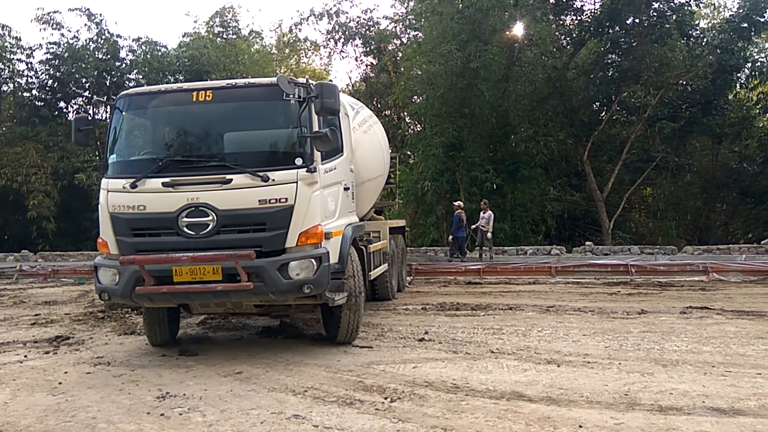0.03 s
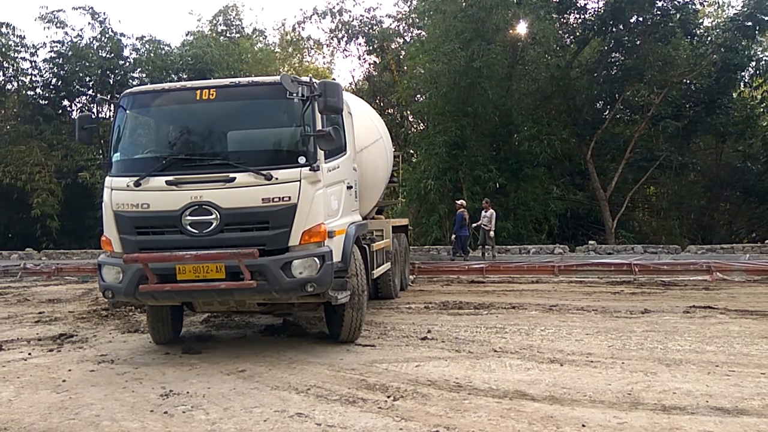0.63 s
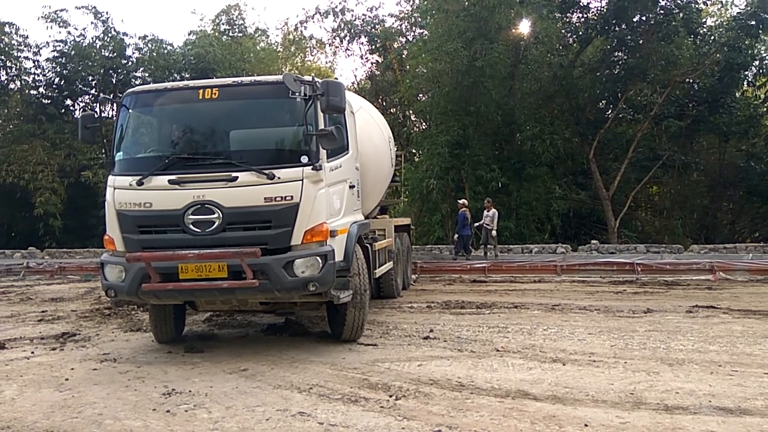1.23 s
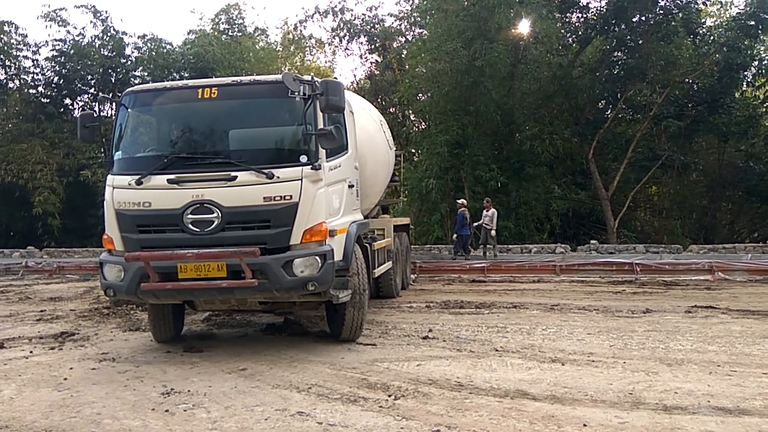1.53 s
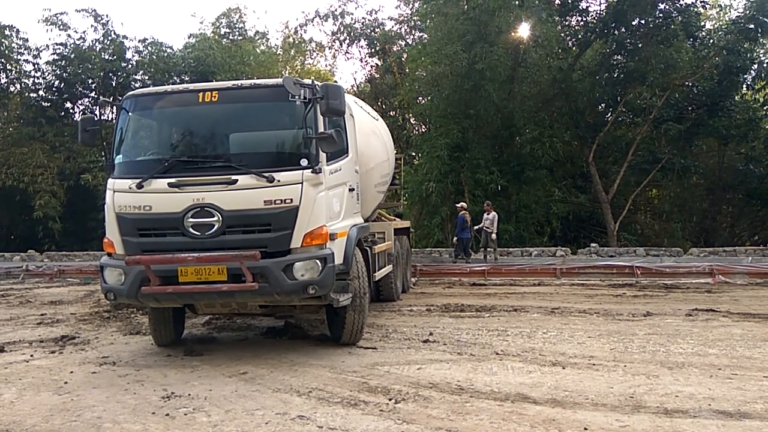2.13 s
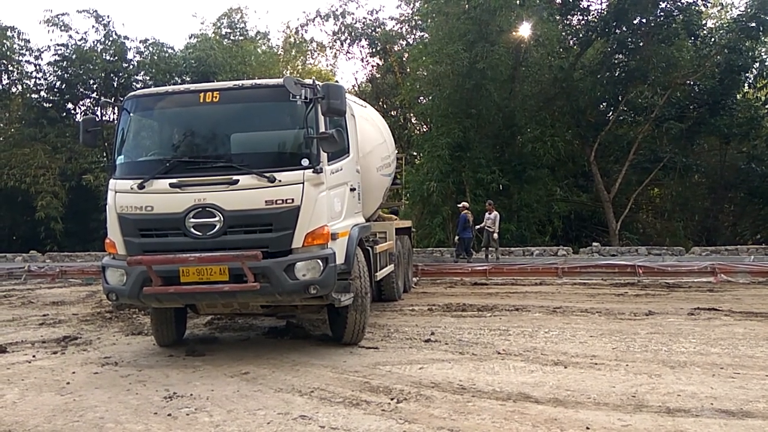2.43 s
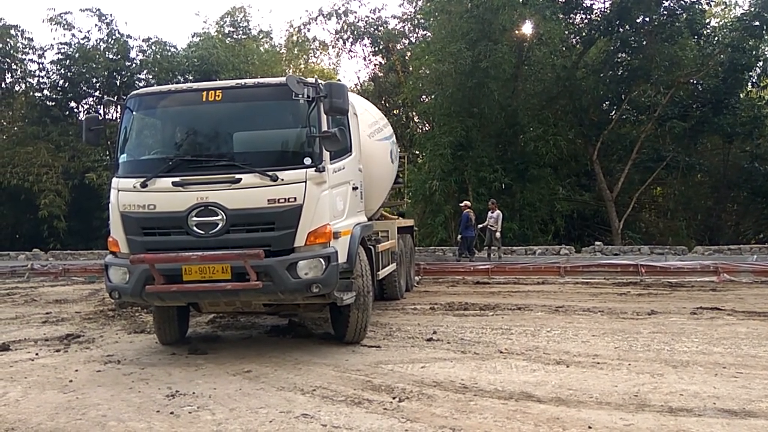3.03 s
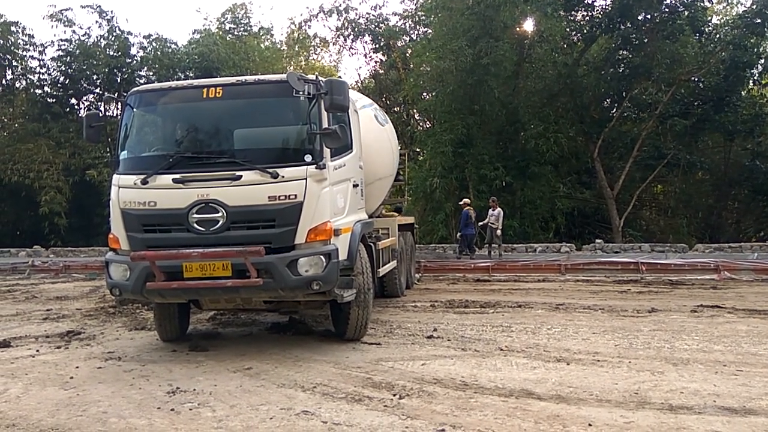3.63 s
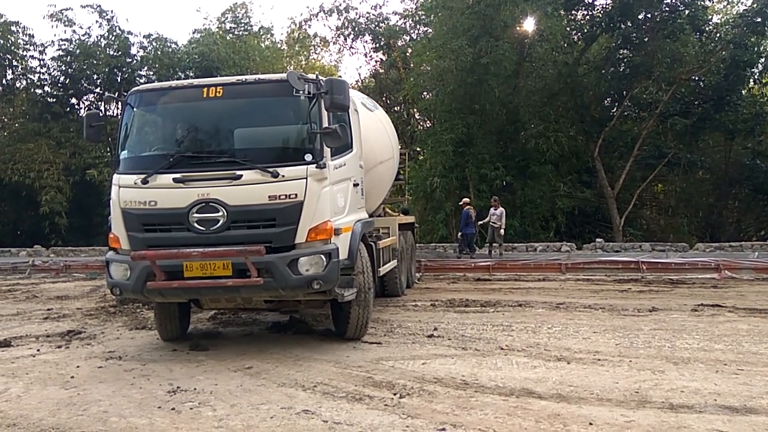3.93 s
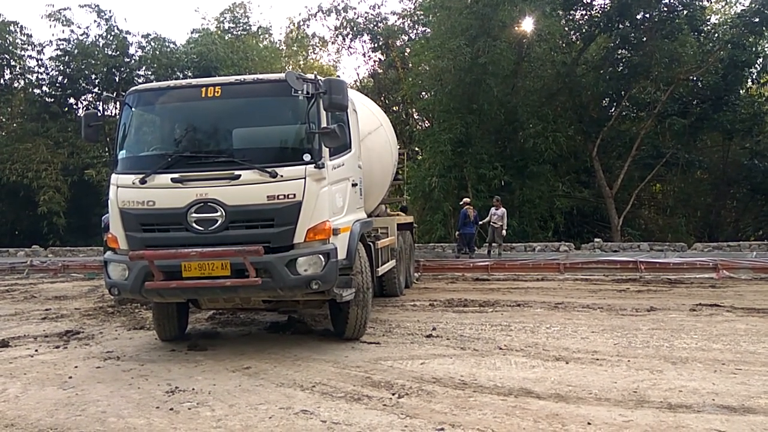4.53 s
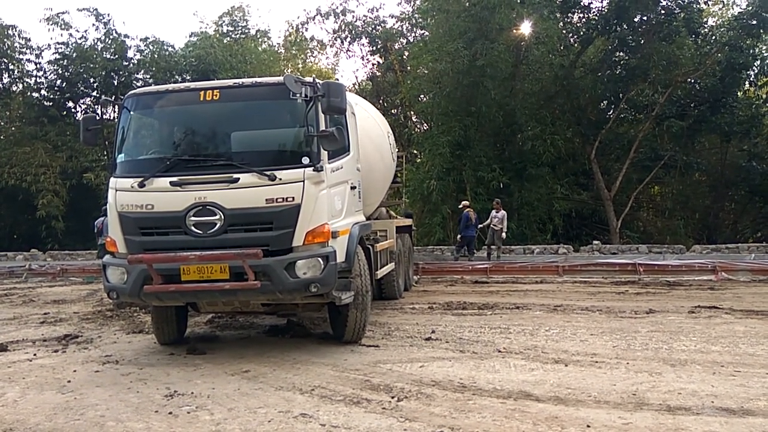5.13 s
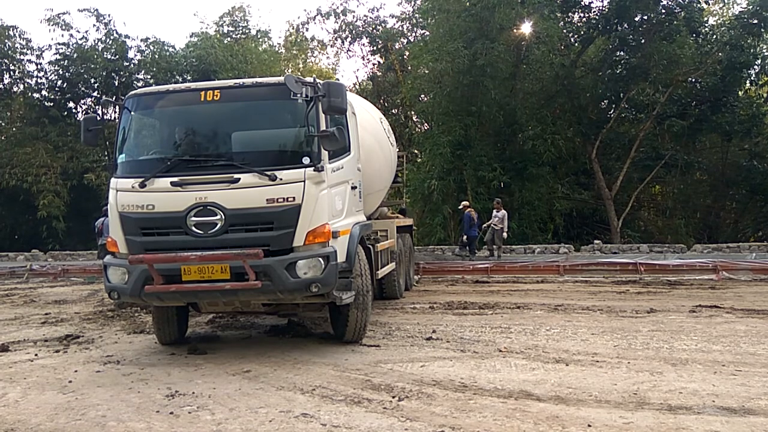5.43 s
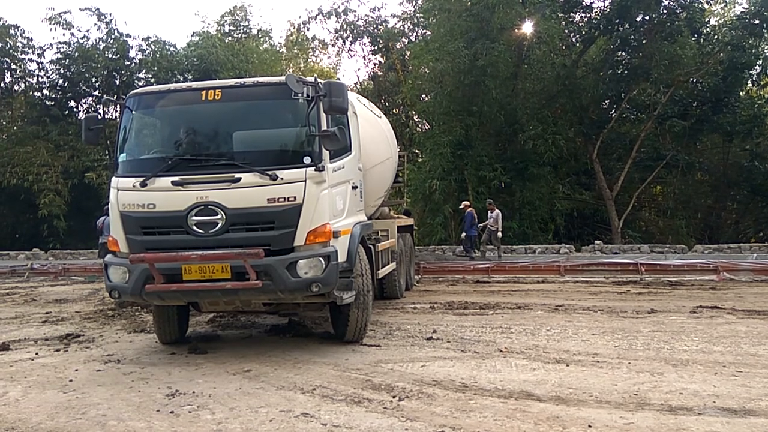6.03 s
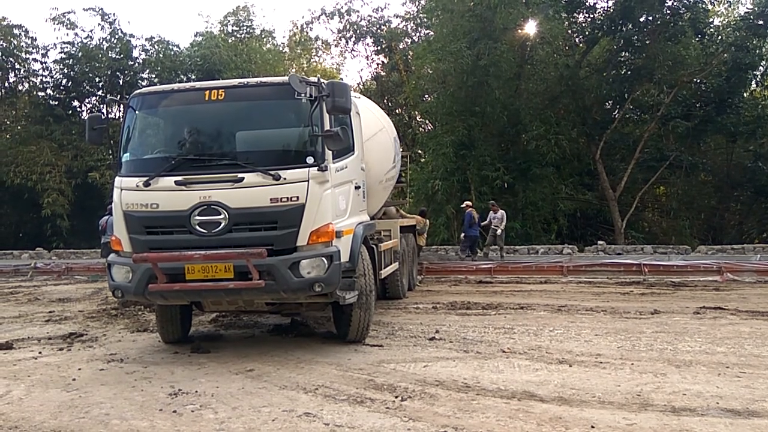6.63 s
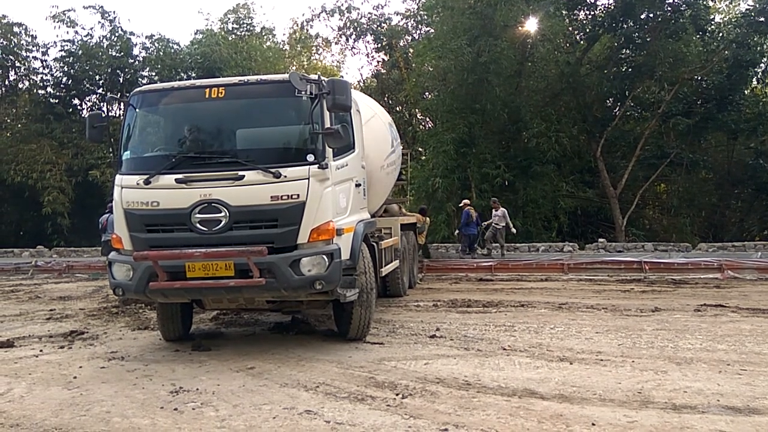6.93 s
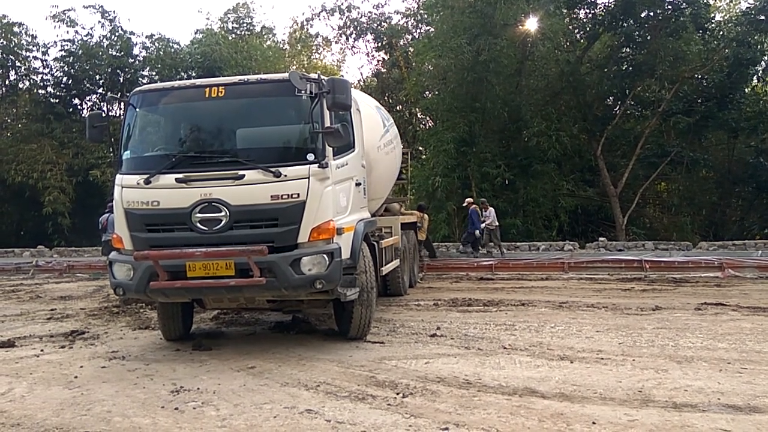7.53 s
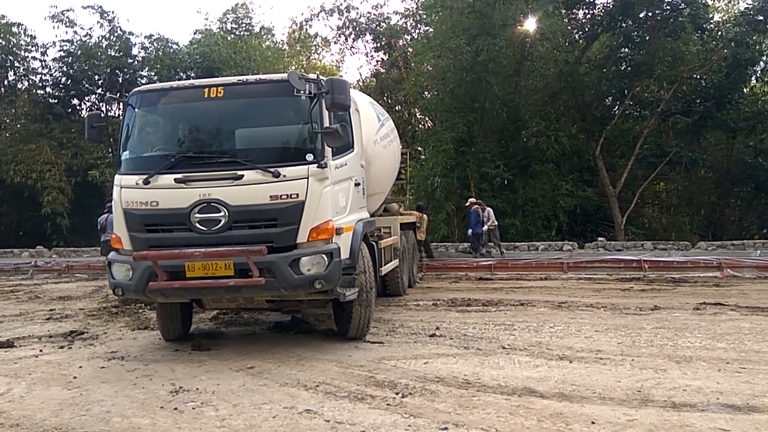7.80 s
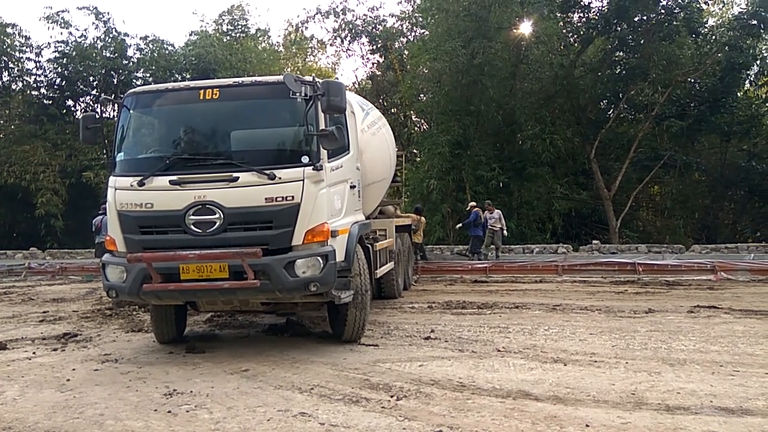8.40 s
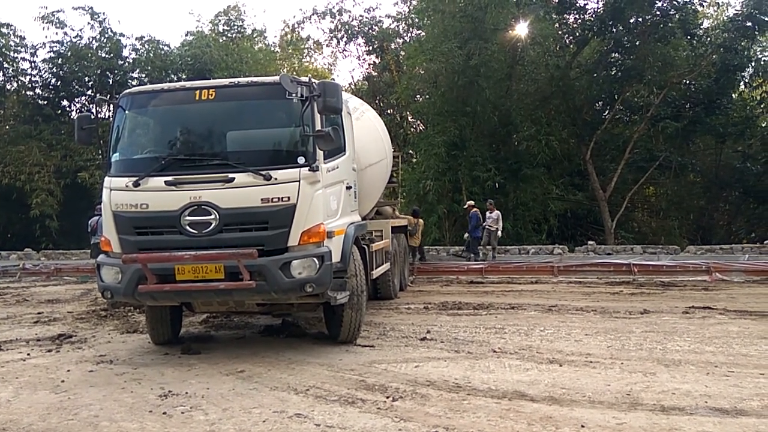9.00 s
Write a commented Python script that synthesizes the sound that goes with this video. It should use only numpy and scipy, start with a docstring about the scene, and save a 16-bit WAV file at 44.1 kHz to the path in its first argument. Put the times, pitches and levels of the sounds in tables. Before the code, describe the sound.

A concrete mixer truck's diesel engine runs at high revs, humming, knocking and whining, while wet concrete thuds in the turning drum and stones rattle against the steel shell. The revs ease, then drop to a clacking idle. A few hard raps follow, loose fittings clink faintly and the engine picks up again. It is heard in stereo on open ground, slightly to the right.

```python
"""A concrete mixer truck on open ground, a little off the axis of a stereo microphone pair.
First the six-cylinder diesel runs at high revs: exhaust hum, knocking block, gear whine and fan rush,
while wet concrete thuds in the turning drum and stones ring its steel shell. From 3.5 s the revs ease;
at 6.6 s the fuel is cut and they sink to a clacking idle, baring a panel's drone and the site's hiss.
Near 8 s the fuel returns with hard raps, loose fittings clink and the revs pick up again."""
import sys
import numpy as np
from scipy import signal
from scipy.fft import rfft, irfft, next_fast_len
from scipy.io import wavfile
from scipy.ndimage import uniform_filter1d, map_coordinates

SR = 44100
rng = np.random.default_rng(int(sys.argv[2]) if len(sys.argv) > 2 else 0)


def inscribe(sig):
    """Save sig as 16-bit PCM at rate SR to the path in sys.argv[1].

    A 1-D sig is mono; a 2-D sig holds one channel per row.
    Samples are clipped to [-1, 1] before scaling.
    """
    pcm = np.round(np.clip(np.atleast_2d(sig).T, -1, 1) * 32767)
    wavfile.write(sys.argv[1], SR, pcm.astype(np.int16))


N = 408366
FULL_EFFORT_DB = -34  # knock level of the engine working hardest

# how alike the two microphones hear a source: (frequency [Hz], likeness [0-1])
MIC_LIKENESS = [(60, .99), (400, .98), (1000, .9), (2000, .7), (4000, .25), (7000, .2)]
# spectrum of the knocking engine block: (frequency [Hz], level [dB])
BLOCK_SPECTRUM = [(30, -29.5), (65, -5.5), (110, 2.5), (175, 7), (250, -12.5), (345, 7), (470, -5.5),
                  (600, -14.5), (720, -6), (820, -9), (1180, 1.5), (1450, -9.5), (1790, -2), (2280, -1.5),
                  (2800, -12.5), (3200, -21.5), (4000, -27.5), (4600, -32), (5900, -24.5), (7200, -41)]
# modes of the block that clack at each firing: (frequency [Hz], level [dB], t60 [s])
BLOCK_MODES = [(870, -4, .045), (1090, -3, .05), (1190, 0, .05), (1660, -4, .045), (1790, -4, .045),
               (2160, -4.5, .05), (2270, -5.5, .055), (2730, -13, .04)]
# spectrum of stones on the steel shell: (frequency [Hz], level [dB])
GRAVEL_SPECTRUM = [(250, -34.5), (520, -3.5), (660, -2.5), (860, 1.5), (1230, 0), (1400, -10.5), (1650, -4),
                   (2350, -9), (2900, -13.5), (3200, -24.5), (4000, -30), (4700, -19), (5900, -19),
                   (7200, -47.5)]
# the hardest firings as the fuel comes back: (time [s], level [dB])
HARD_FIRINGS = [(7.896, -31), (7.952, -28), (7.9803, -25), (8.006, -21), (8.11, -30), (8.136, -19),
                (8.262, -23), (8.309, -21), (8.358, -22), (8.428, -21), (8.498, -21), (8.631, -20),
                (8.675, -19), (8.923, -20)]


def amp(db):
    """Decibels to gain."""
    return 10 ** (np.asarray(db) / 20)


def unit(x):
    """Scale to rms 1."""
    return x / np.sqrt(np.mean(x ** 2) + 1e-20)


def along(points, hz):
    """(Hz, value) points read on a log axis."""
    f, v = np.transpose(points)
    return np.interp(np.log(hz + 1), np.log(f + 1), v)


def curve(points):
    """(time, value) points read at every sample."""
    return np.interp(np.arange(N) / SR, *np.transpose(points))


def noise(size=N):
    """Two unrelated white noises."""
    return rng.standard_normal((2, size))


def wobble(rate):
    """A smooth random curve, rate knots a second."""
    return map_coordinates(rng.standard_normal(int(N * rate / SR) + 4), [np.arange(N) * rate / SR])


def filtered(x, response):
    """Pass x through a frequency response."""
    size = next_fast_len(N + SR // 2)
    return irfft(rfft(x, size) * response(np.fft.rfftfreq(size, 1 / SR)), size)[..., :N]


def colour(points):
    """The response of a (Hz, dB) spectrum."""
    return lambda hz: amp(along(points, hz))


def resonances(modes):
    """The response of (Hz, width Hz, dB) resonances, which radiate little below their pitch."""
    return lambda hz: sum(amp(db) * 1j * hz * width / (centre ** 2 - hz ** 2 + 1j * hz * width)
                          * np.minimum(hz / centre, 1) ** 2 for centre, width, db in modes)


def radiate(sound, response):
    """Two signals coloured by a body, at rms 1; scattering makes the microphones differ in the treble."""
    def mid_and_side(hz):
        angle = np.arccos(np.clip(along(MIC_LIKENESS, hz), 0, .99)) / 2
        return response(hz) * np.array([np.cos(angle), np.sin(angle)])
    mid, side = filtered(sound, mid_and_side)
    return unit(np.array([mid + side, mid - side]))


def bursts(times, sizes, t60):
    """Envelope of blows that each die away; their energies add."""
    blows = np.bincount(np.clip(times * SR, 0, N).astype(int), sizes ** 2, N + 1)[:N]
    fade = amp(-60 * np.arange(SR // 2) / SR / t60) ** 2
    return np.sqrt(np.abs(signal.fftconvolve(blows, fade)[:N]))


def patter(count, spread_db, t60):
    """Envelope of many random impacts of uneven size."""
    return unit(bursts(rng.random(count) * N / SR, amp(spread_db * rng.standard_normal(count)), t60))


def swells(rows, attack_s=.018, t60=.27):
    """Envelope of (time, length, dB) surges: each rises, holds and dies away; their energies add."""
    t = np.arange(N) / SR
    energy = np.zeros(N)
    for start, length, db in rows:
        span = slice(int(start * SR), int(start * SR) + 2 * SR)
        age = t[span] - start
        shape = np.clip(age / attack_s, 0, 1) * amp(db - 60 * np.maximum(age - length, 0) / t60)
        energy[span] += shape ** 2
    return np.sqrt(energy)


def pings(times, hz, db, t60):
    """Single modes struck once each; every one reaches the two microphones with its own phase gap."""
    t = np.arange(SR // 18) / SR
    samples = ((times * SR).astype(int)[:, None] + np.arange(len(t))).ravel()
    envelope = amp(db[:, None] - 60 * t / t60) * (1 - np.exp(-t / .0012))
    skew = np.arccos(np.clip(along(MIC_LIKENESS, hz), 0, 1)) * rng.standard_normal(len(hz)) / 2
    phase = 2 * np.pi * hz[:, None] * t
    rings = (envelope * np.sin(phase + side * skew[:, None]) for side in (1, -1))
    return np.array([np.bincount(samples, ring.ravel(), N)[:N] for ring in rings])


def struck(modes, times, db, detune=.03, scatter_db=3.5, spread_s=.003):
    """Blows on one object: each shock reaches all its modes within spread_s, never twice the same."""
    hz, mode_db, t60 = np.tile(np.transpose(modes), len(times))
    pitch, size = rng.standard_normal((len(hz), 2)).T
    starts = np.repeat(times, len(modes)) + spread_s * rng.random(len(hz))
    level_db = np.repeat(db, len(modes)) + mode_db + scatter_db * size
    return pings(starts, hz * (1 + detune * pitch), level_db, t60[:, None])


def exhaust(firings, firing_hz, knock_db, slowing, fuel_cut_db=-13.5):
    """The pipe hums at the firing rate and its octave, louder with effort and where it resonates."""
    # the pipe favours some firing rates: (firing rate [Hz], level [dB])
    pipe = [(37, -60), (43, -46), (49, -36), (63, -36), (73, -35.5), (75, -29), (83, -32.5)]
    level_db = along(pipe, firing_hz) + .51 * (knock_db - FULL_EFFORT_DB) + fuel_cut_db * slowing ** 4
    note = amp(level_db - 1 + 1.1 * wobble(7.7)) * np.sin(2 * np.pi * firings)
    # a harder burn gives a sharper puff
    octave = amp(knock_db - 5 + 1.8 * wobble(6)) * np.sin(4 * np.pi * firings)
    return np.sqrt(2) * (note + octave * (firing_hz / firing_hz.max()) ** .84)


def knock(firings, knock_db, cylinder_db=2.2, scatter_db=.43, attack_s=.002, t60=.078):
    """Each firing raps the block: every cylinder has its own ring, plus clatter that never repeats."""
    beat = np.arange(int(firings[-1]))
    times = np.interp(beat, firings, np.arange(N) / SR)
    imbalance_db = cylinder_db * np.resize(rng.standard_normal(6), len(beat))
    sizes = amp(imbalance_db + scatter_db * rng.standard_normal(len(beat)))
    t = np.arange(SR // 6) / SR
    decay = amp(-60 * t / t60) * (1 - np.exp(-t / attack_s))
    rings = np.zeros((2, N))
    for cylinder in range(6):
        own = beat % 6 == cylinder
        blows = np.bincount((times[own] * SR).astype(int), sizes[own], N)
        rings += signal.fftconvolve(blows[None], noise(len(t)) * decay, axes=1)[:, :N]
    clatter = uniform_filter1d(bursts(times, sizes, t60), size=240) * noise()
    force = unit(rings) + .53 * unit(clatter)
    weight = 1 / np.sqrt(np.gradient(firings))  # slower firings each carry more energy
    return amp(knock_db + 3.5) * radiate(force * weight, colour(BLOCK_SPECTRUM))


def valves(firings, knock_db, per_firing=4, late_beats=.4, low_hz=690, high_hz=2800):
    """Valves and injectors ping on the block slightly after each firing."""
    beat = np.repeat(np.arange(int(firings[-1])), per_firing)
    lag, pitch, size = rng.random((len(beat), 3)).T
    at = np.minimum(np.searchsorted(firings, beat + late_beats * lag), N - 1)
    hz = low_hz + (high_hz - low_hz) * pitch
    db = knock_db[at] - 2 + along(BLOCK_SPECTRUM, hz) + 6 * size
    return pings(at / SR, hz, db, t60=.085)


def clacks(firings, firing_hz, knock_db):
    """The diesel clack: a short ring of the block at every firing, hardest at low revs."""
    at = np.searchsorted(firings, np.arange(1, int(firings[-1])))
    softening_db = 20 * np.log10(firing_hz[at] / firing_hz.min())
    db = knock_db[at] + 2.7 - softening_db + 2.5 * rng.standard_normal(len(at))
    return struck(BLOCK_MODES, at / SR, db)


def gears(firings, firing_hz, knock_db, slowing):
    """Gear tones swell as they sweep through the resonances of the block and the gear case."""
    # gear whines: (pitch [x firing rate], level [dB], lift in a case band [dB], lift as revs fall [dB])
    whines = [(13, -7, 0, 0), (13.333, -9, 0, 0), (14.5, -9, 0, 0), (16.5, -13, 14, 2), (17.1, -17, 9, 9),
              (22.333, -12, 0, 0), (27.333, -16, 0, 0), (31.68, -12, 2, 2), (34.8, -4, 11, 7),
              (36.6, -11, 6, 12), (39.6, -5, 0, 2)]
    # bands where the gear case sings: (centre [Hz], width [Hz], strength [0-1])
    case_bands = [(1190, 70, 1), (1670, 65, .6), (1815, 65, .7), (2170, 60, .55)]
    tones = np.zeros(N)
    for multiple, db, case_db, overrun_db in whines:
        hz = multiple * firing_hz
        singing = sum(strength / (1 + ((hz - centre) / width) ** 2)
                      for centre, width, strength in case_bands)
        lift_db = case_db * np.minimum(singing, 1) + overrun_db * slowing
        level_db = knock_db + db + lift_db + along(BLOCK_SPECTRUM, hz) + 2.4 * wobble(16)
        chatter = (.2 + .7 * slowing) * wobble(70)  # unloaded teeth roughen the tone
        tones += amp(level_db) * np.sin(2 * np.pi * multiple * firings + chatter)
    return np.sqrt(2) * tones * (firing_hz / firing_hz.max()) ** 2


def fan(firings, speed):
    """The cooling fan: a rush and a fuzzy, throbbing blade tone, both growing with engine speed."""
    # swells of the blade tone: (time [s], length [s], level [dB])
    hoots = [(.77, .06, -34), (1.21, 0.1, -30.5), (1.38, 0.3, -30), (2.3, 0.16, -32), (2.55, 0.063, -26),
             (2.94, 0.1, -40.5), (3.21, 0.053, -26), (3.4, .06, -34)]
    # spectrum of the rushing air: (frequency [Hz], level [dB])
    air_spectrum = [(30, -2.5), (100, 6.5), (1000, -7), (2600, -6.5), (3300, -15), (4000, -23),
                    (4700, -20.5), (6000, -10.5), (7200, -27.5)]
    phase = 2 * np.pi * 5.85 * firings
    tone = wobble(30) * np.sin(phase) + wobble(30) * np.cos(phase)
    blade_level = np.hypot(amp(-38) * speed ** 6, swells(hoots)) * speed ** 2
    rush = amp(-45 + .62 * wobble(2.7)) * speed ** .5 * radiate(noise(), colour(air_spectrum))
    return blade_level * tone + rush


def drum_drive(firings, speed, knock_db):
    """Pump and drum drive hum with the crank, harder under load, and fade quickly as the revs drop."""
    # drive tones: (pitch [x firing rate], level [dB], flutter [dB], phase jitter [rad])
    hums = [(1.48, -41.5, 2, .7), (1.713, -32.5, 5, .6), (1.975, -29, 3.5, 0.73), (4.337, -33, 3.5, 0.63)]
    tones = np.zeros(N)
    for multiple, db, flutter_db, jitter in hums:
        level = amp(db + flutter_db * wobble(6))
        tones += level * np.sin(2 * np.pi * multiple * firings + jitter * wobble(10))
    return np.sqrt(2) * tones * speed ** 7 * amp(.72 * (knock_db - FULL_EFFORT_DB))


def tumbling(db):
    """Gain of the load as it tumbles unevenly, wandering around db."""
    return amp(db + 1.7 * wobble(13))


def drum_boom(load, speed):
    """Wet concrete drops off the blades and thuds in the hollow drum."""
    # heavy masses falling: (time [s], length [s], level [dB])
    drops = [(0.13, 0.16, -23), (0.34, 0.14, -23.5), (0.69, .36, -22.5), (1.18, 0.11, -27.5),
             (1.39, 0.042, -21.5), (1.65, 0.023, -22.5), (1.86, .06, -23), (2.21, 0.064, -22),
             (2.41, 0.045, -22.5), (2.65, 0.24, -23), (2.77, 0.05, -24), (2.93, 0.028, -21),
             (3.07, 0.048, -24), (3.34, 0.044, -19), (3.52, 0.039, -25.5), (3.71, 0.099, -24),
             (4.58, .1, -31.5), (4.73, 0.12, -22), (5.31, 0.012, -22.5), (6.86, 0.13, -37.5),
             (8.48, 0.053, -32.5), (8.7, 0.043, -24.5), (9.08, 0.12, -28.5)]
    # spectrum of a dull thud: (frequency [Hz], level [dB])
    thud_spectrum = [(25, -31), (45, -44.5), (58, -17), (110, -14.5), (130, -10), (150, 0), (205, 0),
                     (250, -7), (330, -29), (600, -66)]
    # deep resonances of the hollow drum: (centre [Hz], width [Hz], level [dB])
    cavity_modes = [(142.6, 3, 0.5), (168.4, 13, -2), (206.1, 5, 0)]
    thuds = radiate(patter(count=2500, spread_db=.5, t60=.051) * noise(), colour(thud_spectrum))
    cavity = amp(-6) * radiate(noise(), resonances(cavity_modes))
    return np.hypot(tumbling(8.5) * load * speed ** 2.4, swells(drops)) * unit(thuds + cavity)


def churn(load, speed):
    """Lumps of wet concrete churn and slump along the shell."""
    # slumps: (time [s], length [s], level [dB])
    slumps = [(0, 0.068, -24.5), (.64, 0.046, -29), (1.18, 0.09, -27), (1.49, 0.066, -24.5),
              (1.68, 0.084, -24.5), (2.12, 0.056, -22), (2.78, 0.053, -27), (3.03, 0.063, -22.5),
              (3.62, 0.18, -29), (3.96, 0.1, -32.5), (4.24, 0.071, -31.5), (4.5, 0.043, -32),
              (4.82, 0.1, -47), (5.18, 0.037, -25), (5.28, 0.07, -24), (5.48, 0.13, -30),
              (5.74, 0.098, -34), (6.35, 0.15, -35), (6.62, 0.37, -38.5)]
    # spectrum of the churning lumps: (frequency [Hz], level [dB])
    lump_spectrum = [(120, -56.5), (200, -5), (255, 2.5), (330, 4.5), (385, -4), (470, -3), (525, -10.5),
                     (700, -12.5), (1200, -59)]
    lumps = radiate(patter(count=3000, spread_db=3, t60=.05) * noise(), colour(lump_spectrum))
    return np.hypot(tumbling(8) * load * speed ** 2.4, swells(slumps)) * lumps


def shell_ring(load, speed):
    """The tumbling load keeps the steel shell ringing."""
    # modes of the shell: (centre [Hz], width [Hz], level [dB])
    shell_modes = [(256.8, 20, 2), (318.6, 2.6, 0.5), (415.3, 16, -0.5), (726, 14, -4), (880, 9, -2.5),
                   (1077, 25, -9), (1175, 3.3, -13.5)]
    return tumbling(4.5) * load * speed ** 1.9 * radiate(noise(), resonances(shell_modes))


def rattle(count=3600, low_hz=600, high_hz=2900, spread_db=4):
    """Stones strike the shell one by one, each ringing a mode of its own."""
    when, pitch = rng.random((count, 2)).T
    hz = low_hz + (high_hz - low_hz) * pitch
    db = along(GRAVEL_SPECTRUM, hz) + spread_db * rng.standard_normal(count)
    return unit(pings(when * N / SR, hz, db, t60=.07))


def gravel(load, speed):
    """A fast drum throws stones about, and now and then they pour over the shell."""
    # pours of stones: (time [s], length [s], level [dB])
    spills = [(0, 0.97, -31.5), (1.08, .27, -29.5), (1.40, 0.033, -24.5), (1.49, 0.038, -26.5),
              (2.02, 0.041, -29), (2.12, 0.039, -24.5), (2.55, 0.052, -25), (2.775, 0.061, -25.5),
              (2.94, 0.027, -26.5), (3.065, 0.017, -23), (3.36, 0.068, -27.5), (5.245, 0.15, -31)]
    # falling stones ring brighter than tumbling ones: (frequency [Hz], gain [dB])
    spill_tilt = [(600, -4), (1200, -0.5), (2200, 2.5)]
    stones = radiate(patter(count=5000, spread_db=1, t60=.047) * noise(), colour(GRAVEL_SPECTRUM))
    grit = unit(stones + amp(1) * rattle())
    thrown = amp(6.5 + 1.2 * wobble(11)) * load * speed ** 2.33 * grit
    falling = filtered(np.roll(grit, SR, axis=1), colour(spill_tilt))  # shifted to sound as other stones
    return thrown + swells(spills, attack_s=.035, t60=.28) * falling


def stone_strikes(t60=.04):
    """A big stone lands with a crack and rings one spot of the shell."""
    # landings: (time [s], level [dB], ring [Hz])
    landings = [(0.242, -13, 705), (0.524, -14, 1070), (0.639, -13, 1130), (0.857, -16, 1130),
                (1.147, -12, 902), (2.136, -14, 1120), (2.574, -13, 1250), (3.066, -13, 877),
                (5.256, -14, 840)]
    times, db, hz = np.transpose(landings)
    crack = bursts(times, amp(db - 12), t60) * radiate(noise(), colour(GRAVEL_SPECTRUM))
    return crack + pings(times, hz, db - 9, t60)


def intake_drone(firings, speed, slowing):
    """The coasting engine drones roughly through its intake, sliding down with the revs."""
    # drone partials: (pitch [x firing rate], level [dB])
    partials = [(2, -33), (3, -29), (3.5, -27), (4, -30), (5, -34)]
    tones = sum(amp(db + 3.6 * wobble(11)) * np.sin(2 * np.pi * multiple * firings + 1.3 * wobble(22))
                for multiple, db in partials)
    return np.sqrt(2) * tones * slowing * speed ** 5.9


def body_panel(drone_db=-48.5):
    """The shaking truck keeps one panel droning, heard at idle; it booms when the engine lurches."""
    # resonance of the panel: (centre [Hz], width [Hz], level [dB])
    panel_modes = [(336, 17, 0)]
    # lurches of the engine: (time [s], length [s], level [dB])
    lurches = [(7.955, .045, -36), (8.14, 0.037, -38), (8.265, .04, -32.5)]
    return np.hypot(amp(drone_db), swells(lurches)) * radiate(noise(), resonances(panel_modes))


def site_hiss():
    """The site and the trees around it hiss faintly behind the truck, heard when the engine idles."""
    # spectrum of the ambience: (frequency [Hz], level [dB])
    site_spectrum = [(30, -18.5), (200, -5), (700, 0), (1150, -4.5), (1380, -8), (1750, 0), (3200, -12),
                     (3900, -9), (4500, -1.5), (6000, -3.5), (7200, -18.5)]
    return amp(-52.5 + .37 * wobble(.23)) * radiate(noise(), colour(site_spectrum))


def raps():
    """A few firings bang out and ring the block as the fuel comes back on."""
    times, db = np.transpose(HARD_FIRINGS)
    blows = uniform_filter1d(bursts(times, amp(db - 13), t60=.04), size=60)
    ring = struck(BLOCK_MODES, times, db - 11)
    return ring + blows * radiate(noise(), colour(BLOCK_SPECTRUM))


def fittings(knock_db, firing_hz, jingles=4200):
    """Loose steel fittings jingle faintly as the engine shakes them and clink clearly as it picks up."""
    # modes of the fittings: (frequency [Hz], level [dB], t60 [s])
    steel_modes = [(4470, -1.5, .045), (4720, -2, .045), (5150, 0, .04), (5500, 0, .04), (5850, -1, .04)]
    # clear clinks: (time [s], level [dB], loudest ring [Hz])
    clinks = [(8.005, -37, 4540), (8.054, -39, 4730), (8.134, -35, 4450), (8.16, -38, 4450),
              (8.229, -38, 5220), (8.271, -41, 4340), (8.357, -40, 5040), (8.434, -38, 5620),
              (8.499, -42, 5250), (8.564, -40, 4540), (8.612, -39, 5240), (8.635, -37, 4430),
              (8.859, -40, 5490), (9.119, -40, 4900), (9.176, -38, 4500), (9.234, -32, 5170)]
    # extra jingle as the revs shake the truck: (firing rate [Hz], gain [dB])
    shake = [(37, 4.5), (41, 2.5), (45, -3), (55, 4), (83, 3)]
    mode_hz, mode_db, t60 = np.transpose(steel_modes)
    times, db, ring_hz = np.transpose(clinks)
    clear = struck(steel_modes, times, db - 13) + pings(times, ring_hz, db - 1, t60.max())
    when, which, size, detune = rng.random((jingles, 4)).T
    mode = (which * len(mode_hz)).astype(int)
    shaken_db = (knock_db + along(shake, firing_hz))[(when * N).astype(int)]
    jingle_hz = mode_hz[mode] * (1 + .1 * (detune - .5))
    jingle_db = shaken_db - 14 + mode_db[mode] + 5 * size ** 2
    return clear + pings(when * N / SR, jingle_hz, jingle_db, t60[mode, None])


def off_axis(sound, lag_s=8.5e-5):
    """The truck stands a little to the right: the left microphone hears it later and mostly softer."""
    # balance of the pair: (frequency [Hz], left minus right [dB])
    balance = [(60, 0.5), (100, -3), (170, -2.0), (290, -1.5), (490, -1), (830, -1.0), (1400, -1.5),
               (2370, 0.5), (4010, -3.5), (6780, -2)]
    sides = np.array([[.5], [-.5]])
    return filtered(sound, lambda hz: amp(sides * along(balance, hz))
                    * np.exp(-2j * np.pi * hz * sides * lag_s))


def scene():
    """Engine speed and effort drive the truck and its load, heard from one spot on the site."""
    # engine speed: (time [s], firing rate [Hz])
    revs = [(0, 82.8), (3.53, 83.0), (3.9, 78.8), (4.2, 76.7), (4.6, 75.3), (5.2, 74.15), (6, 73.25),
            (6.57, 73.1), (6.8, 66.56), (7.4, 45.3), (7.75, 38.3), (7.97, 36.9), (8.5, 44.1), (8.9, 49.3),
            (9.26, 52.3)]
    # how hard the engine works, as its knock: (time [s], level [dB])
    effort = [(0, -34), (1.45, -35.5), (1.7, -41.5), (3.4, -42.5), (3.9, -44.5), (5.0, -43), (5.5, -44),
              (6.4, -44.5), (6.85, -53.5), (7.87, -48), (8.0, -40.5), (8.3, -35), (8.75, -34),
              (9.26, -34.5)]
    firing_hz, knock_db = curve(revs), curve(effort)
    speed = firing_hz / firing_hz.max()
    firings = np.cumsum(firing_hz) / SR  # running count
    firings -= firings[int(HARD_FIRINGS[2][0] * SR)] % 1  # the third hard rap falls on the beat
    slowing = uniform_filter1d(np.maximum(-np.gradient(firing_hz), 0), size=8000)
    slowing /= slowing.max()  # 1 where the revs fall fastest, with the fuel cut
    load = amp(FULL_EFFORT_DB + .57 * (knock_db - FULL_EFFORT_DB))  # the concrete follows effort in part
    engine = (exhaust(firings, firing_hz, knock_db, slowing) + knock(firings, knock_db)
              + valves(firings, knock_db) + raps() + gears(firings, firing_hz, knock_db, slowing)
              + fan(firings, speed) + body_panel() + clacks(firings, firing_hz, knock_db)
              + intake_drone(firings, speed, slowing))
    mixer = (drum_drive(firings, speed, knock_db) + drum_boom(load, speed) + churn(load, speed)
             + shell_ring(load, speed) + gravel(load, speed) + stone_strikes()
             + fittings(knock_db, firing_hz))
    return off_axis(engine + mixer + site_hiss())


def record(dry, top_hz=9800):
    """The recorder dulls the top and keeps nothing above its band limit."""
    # treble roll-off, with a notch and a faint lobe above it: (frequency [Hz], gain [dB])
    roll_off = [(7200, 0), (7450, -10), (7800, -35), (8200, -35), (8600, -13), (9100, -12), (9700, -22)]
    return filtered(dry, lambda hz: amp(along(roll_off, hz)) * (hz < top_hz))


dry = scene()
out = record(dry)
inscribe(out)
```